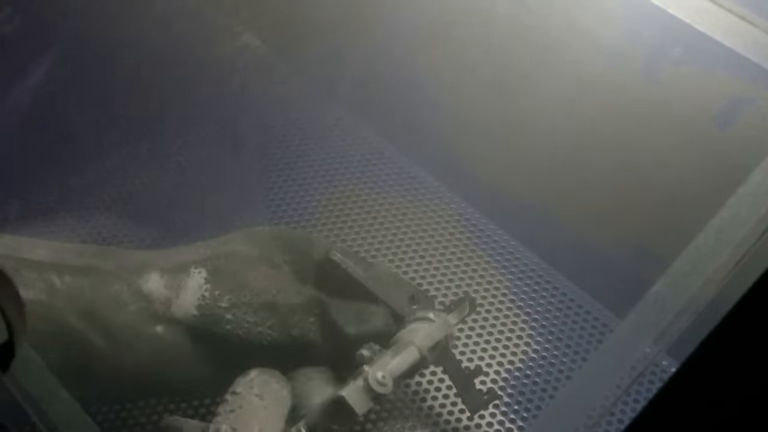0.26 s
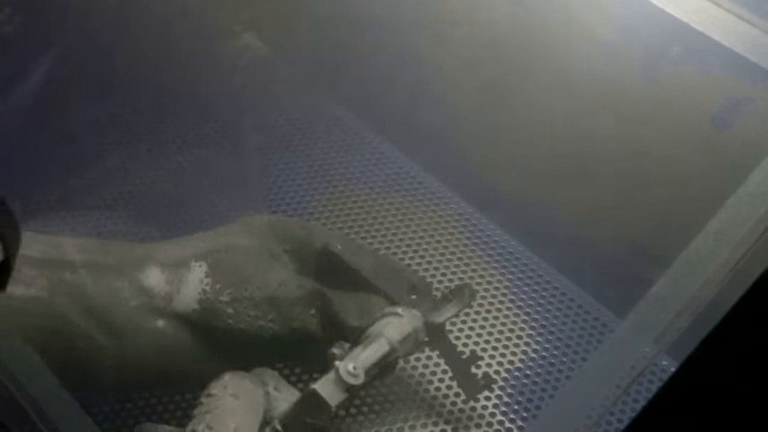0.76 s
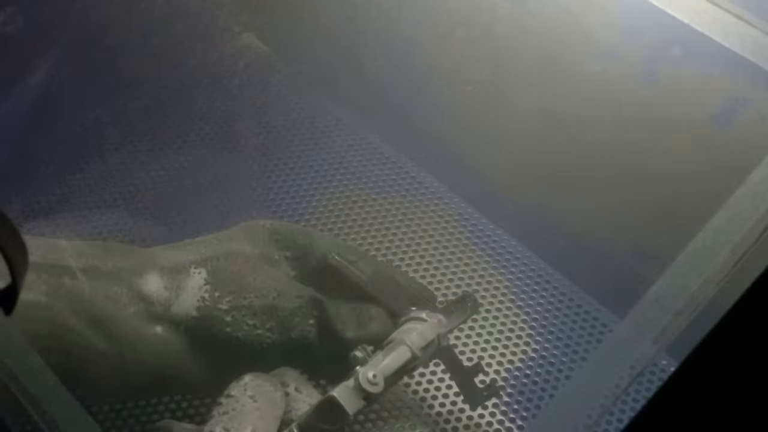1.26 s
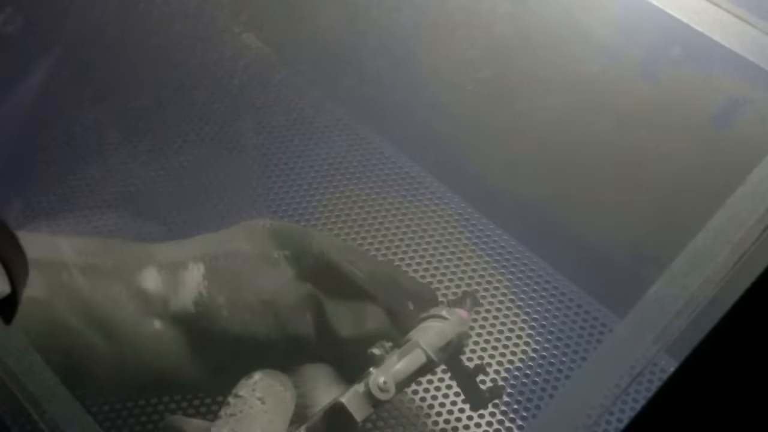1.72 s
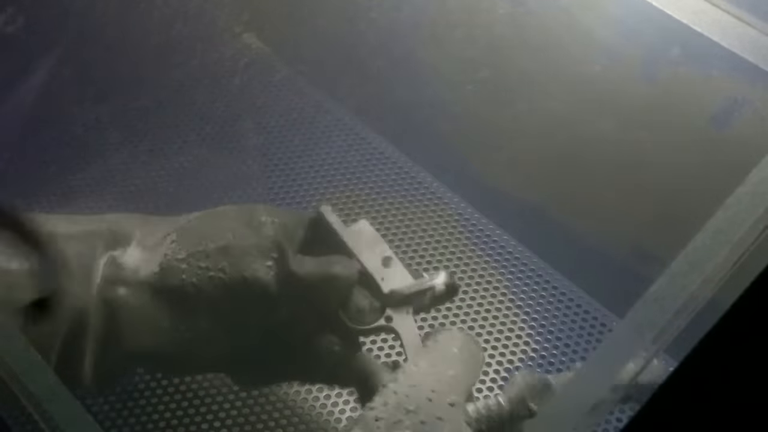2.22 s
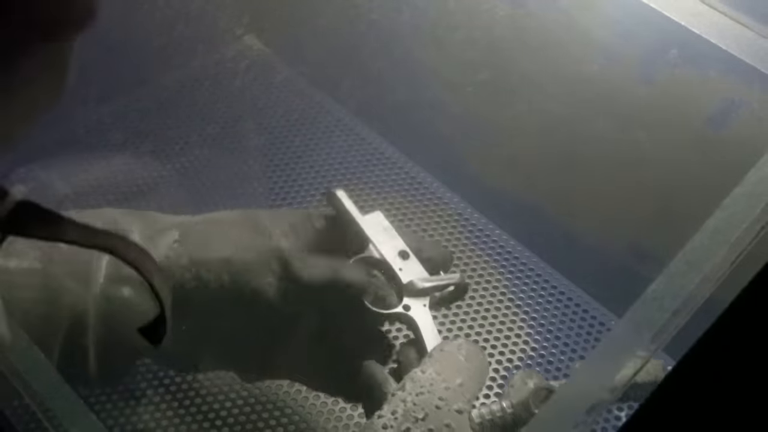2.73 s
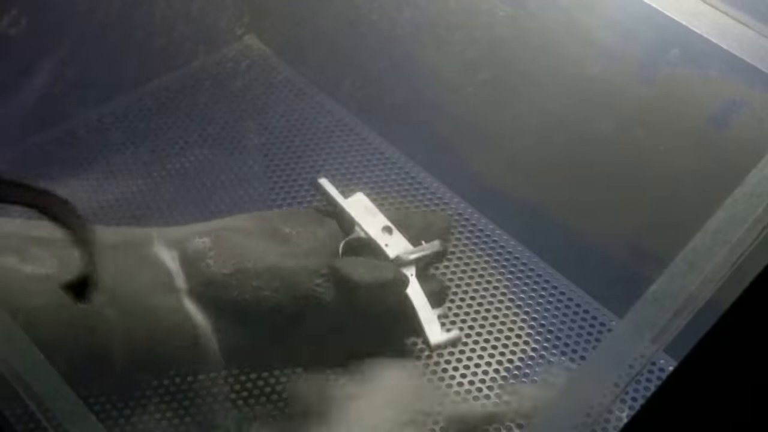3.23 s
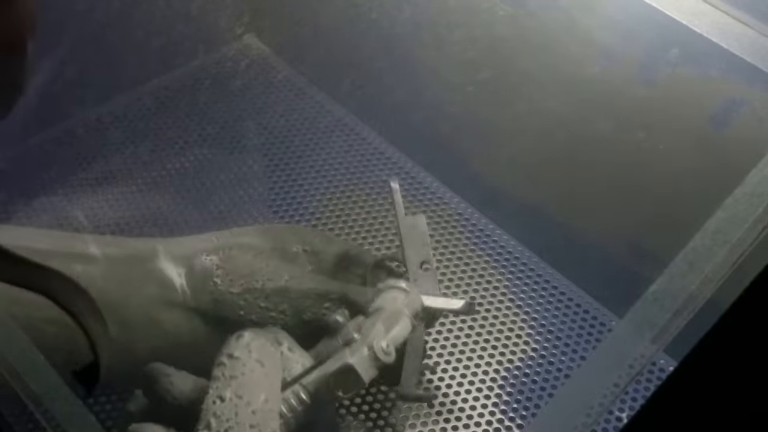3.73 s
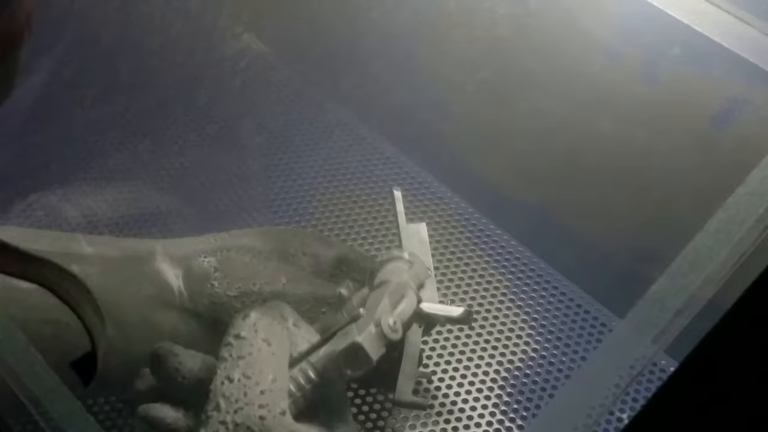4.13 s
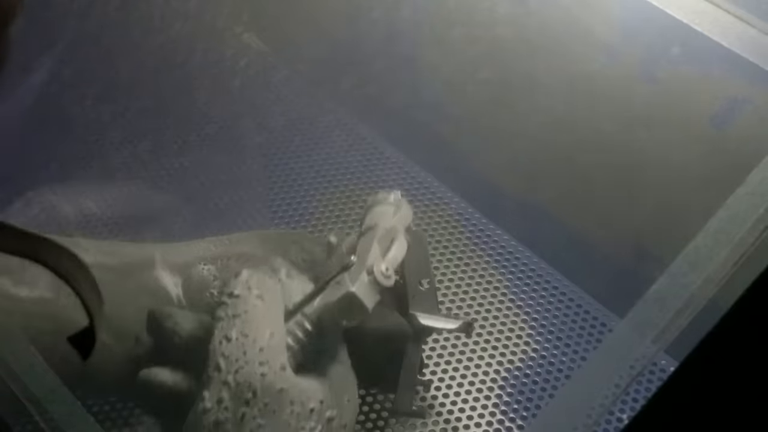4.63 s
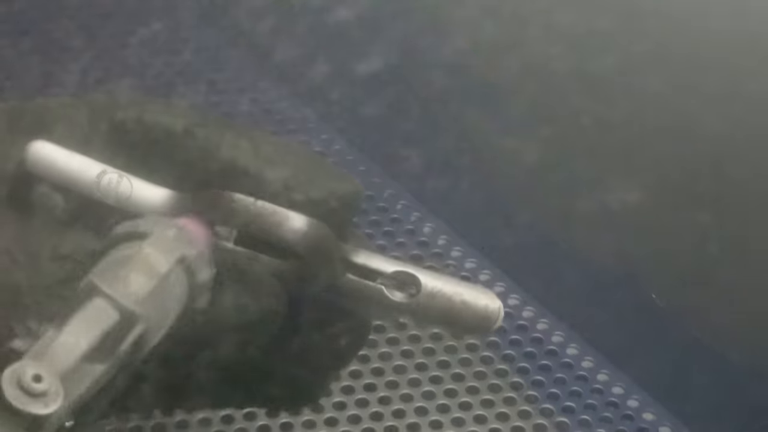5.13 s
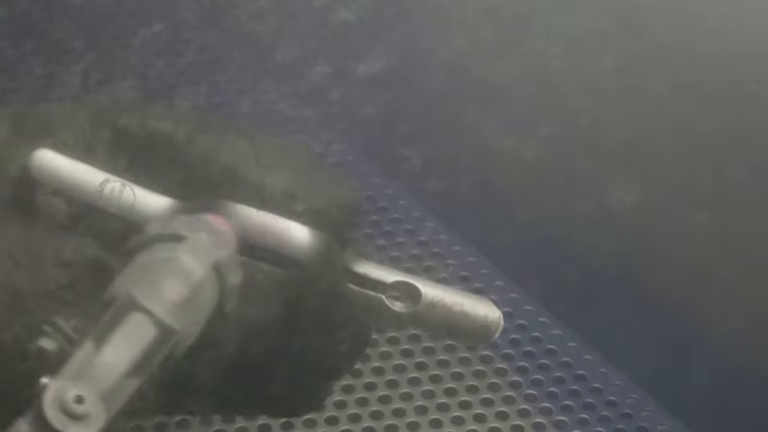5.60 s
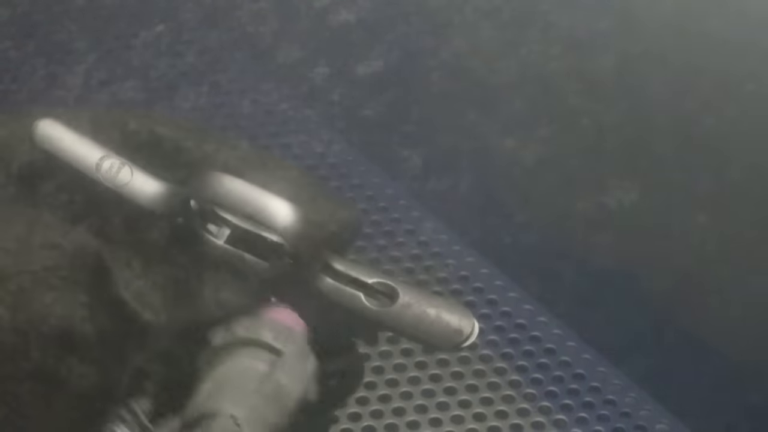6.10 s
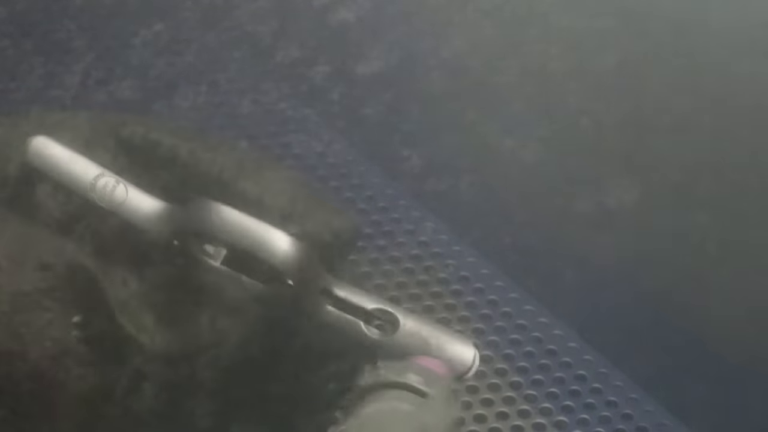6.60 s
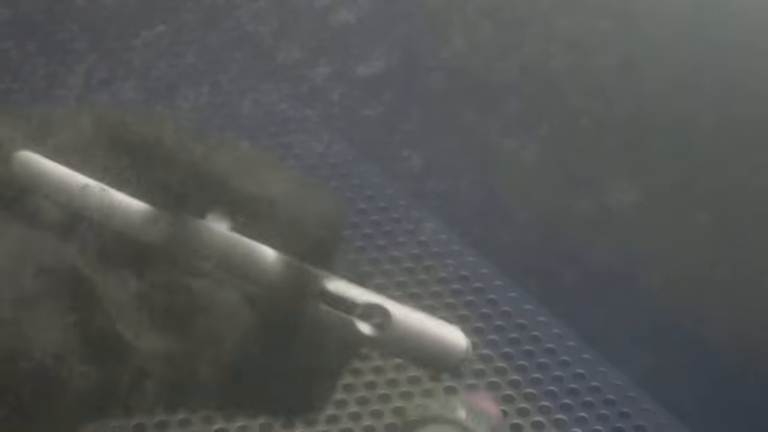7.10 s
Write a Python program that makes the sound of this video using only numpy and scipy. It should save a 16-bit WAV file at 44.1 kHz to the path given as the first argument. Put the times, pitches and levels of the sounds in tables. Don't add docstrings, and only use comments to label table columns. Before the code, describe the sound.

A compressed-air gun hisses steadily as fine grit sprays small steel parts in a metal cabinet, motor whining behind, then jumping higher halfway through.

```python
import sys
import numpy as np
from scipy import signal
from scipy.fft import rfft, irfft, next_fast_len
from scipy.io import wavfile
from scipy.ndimage import uniform_filter1d, map_coordinates

SR = 44100
rng = np.random.default_rng(int(sys.argv[2]) if len(sys.argv) > 2 else 0)


def wav_out(sig):
    wavfile.write(sys.argv[1], SR, np.round(np.clip(np.atleast_2d(sig).T, -1, 1) * 32767).astype(np.int16))


def magnitude_from_level(level_db):
    exponent = np.asarray(level_db, float) / 20
    return 10 ** exponent


N = 324135
TOP_HZ = 15740


def unit(x):
    return x / np.sqrt(np.mean(x ** 2))


def along(hz, table, order=1):
    table = np.array(table, float)
    return np.interp(np.log(hz + 1), np.log(table[:, 0]), table[:, order])


def columns(table, t):
    s, *values = np.transpose(table)
    return [np.interp(t, s, v) for v in values]


def walk(rate, size):
    k = int(SR / rate)
    held = np.repeat(rng.standard_normal(size // k + 1), k)[:size]
    smooth = uniform_filter1d(held, k)
    return unit(uniform_filter1d(smooth, k))


def motor(t, setting, shaded, third_db, lean):
    # t/s, half length/s, level/dB
    gaps = [
        (.62, .2, -4),
        (1.45, .3, 4),
        (2.75, .3, -3),
        (4.1, .4, 2.5),
        (5.0, .15, -2),
    ]
    start_hz, drift, open_db, start_db, rise = setting
    elapsed = t - t[0]
    seventh_hz = start_hz + drift * elapsed
    first_db = start_db + rise * elapsed
    seventh_db = open_db - 6.5 * shaded
    seventh_db = seventh_db + sum(db * np.exp(-((t - s) / length) ** 2) for s, length, db in gaps)

    wavering_hz = seventh_hz * (1 + .00015 * walk(12, len(t)))
    phase = 2 * np.pi * np.cumsum(wavering_hz) / (7 * SR)
    low = np.sin(phase) + magnitude_from_level(third_db) * np.sin(3 * phase)
    low = magnitude_from_level(first_db + .8 * walk(6.1, len(t))) * low
    high = magnitude_from_level(seventh_db + 2.3 * walk(10, len(t))) * np.sin(7 * phase)
    return np.sqrt(2) * np.array([low + high, lean[0] * low + lean[1] * high])


def part_rings():
    # from/s, to/s, f/Hz, width/Hz, level/dB
    rings = [
        (2.1, 5, 8165, 70, -67),
        (0, 1.9, 6272, 30, -67),
        (5, 6.4, 4712, 16, -62),
        (5, 7.4, 3323, 12, -67),
        (5, 7.4, 2375, 6, -68),
        (5, 5.2, 4570, 40, -57),
        (5, 7.4, 2642, 12, -66),
        (0, 5, 1932, 12, -69),
        (2.2, 5, 3453, 12, -69),
    ]
    fade_s = .01
    t, out = np.arange(N) / SR, 0
    for start, end, hz, width, db in rings:
        mode = signal.iirpeak(hz, hz / width, fs=SR)
        held = np.clip(np.minimum(t - start, end - t) / fade_s + 1, 0, 1)
        out = out + magnitude_from_level(db) * held * unit(signal.lfilter(*mode, rng.standard_normal(N)))
    return out


def edge_hits():
    # t/s, half length/s, f/Hz, width/Hz, level/dB
    edges = [
        (.76, .04, 10200, 1600, -58),
        (.78, .04, 7200, 1400, -58),
        (1.12, .07, 10500, 1200, -56),
        (2.55, .35, 8170, 90, -63),
        (3.92, .04, 10200, 1600, -59),
        (5.2, .18, 4710, 60, -57),
        (6.15, .06, 13300, 1600, -57),
    ]
    t, out = np.arange(N) / SR, 0
    for s, length, hz, width, db in edges:
        ring = signal.butter(2, [hz - width / 2, hz + width / 2], "band", fs=SR, output="sos")
        swell = np.exp(-((t - s) / length) ** 2)
        out = out + magnitude_from_level(db) * swell * unit(signal.sosfilt(ring, rng.standard_normal(N)))
    return out


def echoes(size, speed, share=.3, t60_s=.3, build_s=.014):
    t = np.arange(1, size) / SR * speed
    decay = np.exp(-np.log(1000) * t / t60_s)
    build = 1 - np.exp(-(t / build_s) ** 2)
    tail = rng.standard_normal(size - 1) * decay * build
    response = rfft(np.append(1, share * tail / np.sqrt(np.sum(tail ** 2))))
    return response / np.sqrt(1 + share ** 2)


def modes_db(hz, modes):
    return sum(db / (1 + (2 * (hz - f) / max(width, 5)) ** 2) for f, width, db in modes)


def panel_ripple(hz, depth_db=.9, spacing_hz=45):
    knots = rng.standard_normal(1200)
    dense = np.clip(hz / 5000, 0, 1) ** 2
    return depth_db * dense * map_coordinates(knots, [hz / spacing_hz], order=3, mode="wrap")


def spray(size, grit_share=0.24, hits_per_s=9000):
    hit = rng.random(size) < hits_per_s / SR
    grit = hit * rng.standard_normal(size)
    return rng.standard_normal(size) + grit_share * unit(grit)


def blast(t, stream, layers_db, poses, speed):
    # f/Hz, level/dB
    jet = [(30, -44.7), (70, -43.9), (120, -31.4), (200, -23.4), (300, -5.7), (450, -2.9), (900, -2.8),
           (1600, -3.5), (2500, 0.0), (4500, -4.1), (7000, -3.7), (11000, -5.2), (15600, -8.4)]
    # f/Hz, width/Hz,
    # level/dB
    cabinet = [(250, 16, -3.1), (290, 28, -6.2), (370, 27, 2.0), (391, 36, 9.8), (402, 16, -4.2),
               (421, 29, 9.2), (466, 17, 5.8), (484, 17, -4.0), (527, 18, 5.2), (569, 8, -1.6),
               (587, 169, -6.5), (621, 23, 3.1), (704, 38, -3.2), (827, 63, 4.9), (896, 42, -3.9),
               (939, 44, -4.4), (1045, 17, 4.1), (1086, 73, 6.1), (1189, 28, 3.9), (1380, 49, 5.1),
               (1478, 47, 5.3), (1491, 23, -7.3), (1600, 211, -4.2), (1664, 33, -2.3), (1741, 33, 4.1),
               (1934, 32, 3.8), (2022, 62, 9.0), (2171, 45, 2.7), (2276, 27, -4.3), (2342, 74, -5.5),
               (2584, 38, 4.1), (2711, 42, -3.3), (2994, 80, 4.8), (3151, 50, -2.7), (3272, 97, -5.3),
             (3355, 38, 3.8), (3449, 70, 5.8), (3910, 75, 2.4), (4280, 278, -3.4), (4809, 67, 4.0),
             (5123, 48, 2.7), (5452, 75, -2.5), (5802, 354, 2.7), (6158, 111, -3.7), (6249, 79, 5.4),
             (6476, 69, -3.7), (7009, 119, -1.7), (7863, 472, -3.3), (8149, 149, 4.5), (8639, 176, -2.6),
             (9382, 441, 0.9), (9884, 468, 3.6), (10569, 185, -2.3), (11160, 464, -2.3), (12002, 659, 1.0),
             (12860, 114, 1.9), (13371, 128, -2.2), (14302, 210, -2.3), (14567, 326, 2.3),
             (15227, 221, -1.9)]
    # f/Hz, unrelated share/dB, lean left/gain
    ports = [(100, -28, 0.0), (450, -32, 0.0), (800, -19, .03), (1250, -24, 0.0), (2100, -14, -.02),
             (2850, -19, 0.0), (3250, -14, -.04), (3700, -20, 0.0), (4400, -15, 0.0), (6200, -13, -.02),
             (8600, -12, -.02), (9800, -14, -.14), (12500, -11.5, -.13), (15500, -9.5, -.08)]

    size = next_fast_len(len(t))
    heard = np.fft.rfftfreq(size, 1 / SR)
    hz = heard / speed
    colour_db = along(hz, jet) + modes_db(hz, cabinet) + panel_ripple(hz)
    box = (heard < TOP_HZ) * magnitude_from_level(colour_db) * echoes(size, speed)
    near, apart = rfft(spray(size)), rfft(spray(size))
    side = along(hz, ports, order=2) * near + magnitude_from_level(along(hz, ports)) * apart

    boom = 1 / (1 + (heard / 1600) ** 8)
    hiss = 1 - 1 / (1 + (heard / 7000) ** 8)
    bands = boom, 1 - boom - hiss, hiss

    force_db = columns(stream, t)[0]
    swing = force_db - force_db.mean()
    swings = 0.7 * uniform_filter1d(swing, int(.5 * SR)), swing, 1.16 * swing
    surge = 0.15 * walk(9, len(t))
    trim_db = -0.68

    out = 0
    for band, db, moves in zip(bands, layers_db, swings):
        layer = 0
        for share, modes in poses:
            spectrum = band * box * magnitude_from_level(modes_db(hz, modes)) * np.array([near, side])
            layer = layer + share * irfft(spectrum, size)[:, :len(t)]
        flicker = 0.12 * walk(22.2, len(t))
        gain = magnitude_from_level(force_db.mean() + db + moves - trim_db + surge + flicker)
        out = out + layer / np.sqrt(np.mean(layer[0] ** 2)) * gain
    return out


def scene():
    # f/Hz, width/Hz, level/dB
    pose_flat = [(622, 17, -2.5), (1387, 34, -3.5), (2092, 93, -1.9), (2348, 154, 1.7), (2511, 77, -5.0),
                 (2699, 20, -3.5), (2919, 144, 1.9), (3496, 165, -4.2), (3817, 25, -3.3), (4064, 37, 3.9),
                 (4271, 39, -4.7), (4320, 39, 5.1), (4367, 60, -4.4), (4970, 51, 2.3), (5232, 44, -2.7),
                 (5518, 58, 4.5), (5745, 34, 4.0), (5935, 56, 3.2), (6096, 51, -3.1), (6618, 50, 3.3),
                 (6845, 66, -2.8), (7307, 45, -3.5), (7910, 39, 2.9), (8104, 30, 3.5), (9416, 221, 1.9),
                 (10102, 75, -3.1), (11129, 55, 3.3), (11580, 128, -2.8), (13730, 81, 3.6),
                 (13972, 46, 3.5)]
    pose_turned = [(1031, 16, 2.7), (2647, 52, -2.5), (2933, 173, 2.6), (3065, 80, -2.8), (3386, 186, 1.4),
                   (3510, 44, -3.9), (3630, 80, -2.1), (4000, 25, -3.0), (4320, 22, 5.3), (4542, 51, 2.5),
                   (4996, 42, 4.3), (5292, 131, -2.1), (5530, 134, 3.2), (5661, 29, -4.3), (6010, 136, 2.3),
                   (6194, 141, -1.8), (6609, 43, 4.4), (7292, 27, -3.4), (7787, 64, -2.6), (8014, 88, -3.6),
                   (8157, 131, 4.2), (8376, 40, 4.5), (9523, 119, 1.8), (9811, 62, 3.1), (10110, 135, -3.0),
                   (10462, 423, -1.5), (11243, 64, -3.1), (11439, 64, 4.0), (11635, 41, -3.3),
                   (13534, 60, -2.6)]
    pose_bar = [(560, 237, 0.9), (1139, 71, 2.2), (1259, 31, -2.9), (1474, 219, 2.1), (1790, 23, 4.4),
                (1981, 31, 3.3), (2118, 48, 2.8), (2465, 32, -5.8), (2654, 76, 3.9), (2849, 72, -6.6),
                (2972, 35, -3.6), (3550, 77, 7.7), (3759, 42, 3.2), (4560, 40, -4.8), (4718, 48, -4.3),
                (4840, 27, 4.0), (5076, 53, -4.0), (5507, 69, -5.6), (5917, 241, -2.9), (6172, 87, 3.1),
                (6801, 90, 2.5), (7781, 43, 3.4), (8162, 84, -6.5), (8875, 37, 4.5), (9203, 48, 3.0),
                (9414, 189, -3.3), (9758, 99, -3.2), (10159, 197, 5.0), (11532, 193, 3.9),
                (11705, 458, -2.3)]
    # t/s, share of the turned pose/0-1
    turn = [
        (0, 0.04),
        (1.3, 0),
        (2.0, 0.3),
        (2.4, 1),
        (3.5, 1),
        (4.98, 0.8),
    ]
    # t/s, level/dB
    stream_slow = [(0, -43), (.45, -44), (.75, -43.5), (1.0, -43.5), (1.12, -43), (2.2, -43.5), (2.45, -43),
                   (3.2, -43), (3.9, -42), (4.7, -42), (4.99, -42.5)]
    stream_fast = [
        (5.02, -41),
        (6.0, -41),
        (6.15, -40.5),
        (6.5, -41),
        (7.35, -41),
    ]
    # boom/dB, jet/dB, grit hiss/dB
    layers_db = [
        (-9, -3.5, -5),
        (-10, -3.5, -4.5),
    ]
    # seventh multiple/Hz, drift/(Hz/s), seventh/dB, fundamental/dB, its rise/(dB/s)
    whine = [
        (6274, 3, -61, -64.2, .7),
        (8317.5, -1.5, -55.7, -54.1, 0.01),
    ]
    third_db = (-11, -8)

    change_s, speed = 5.003, 1.3245
    t = np.arange(N) / SR
    first, second = t[t < change_s], t[t >= change_s]
    turned = np.clip(columns(turn, first)[0], 0, 1)
    slow_poses = [(1 - turned, pose_flat), (turned, pose_turned)]
    slow = blast(first, stream_slow, layers_db[0], slow_poses, 1)
    slow = slow + motor(first, whine[0], turned, third_db[0], (.33, -.35))
    fast = blast(second, stream_fast, layers_db[1], [(1, pose_bar)], speed)
    fast = fast + motor(second, whine[1], 0, third_db[1], (.01, -.3))

    dip = np.clip(np.abs(t - change_s) / .0012, 0, 1)
    mid, side = np.concatenate([slow, fast], axis=1) * dip
    mid = mid + edge_hits() + part_rings()
    return np.array([mid + side, mid - side])


def roll_off(x):
    return signal.sosfilt(signal.butter(12, 16790, fs=SR, output="sos"), x)


def record(dry):
    top = signal.ellip(12, .1, 70, TOP_HZ, fs=SR, output="sos")
    return roll_off(signal.sosfiltfilt(top, dry))


dry = scene()
out = record(dry)
wav_out(out)
```